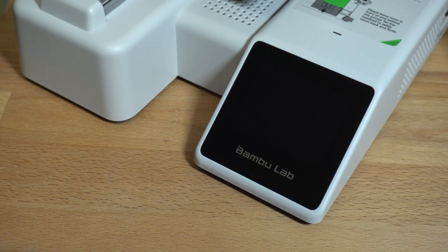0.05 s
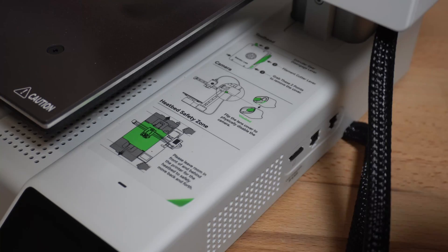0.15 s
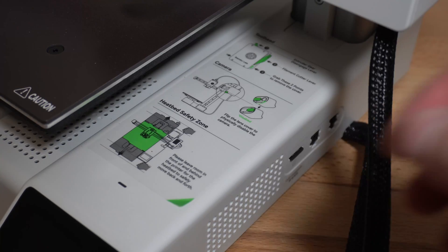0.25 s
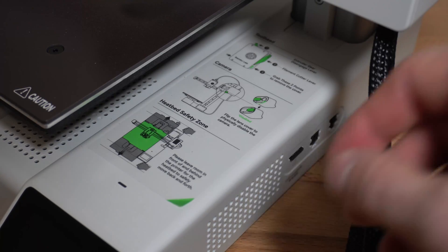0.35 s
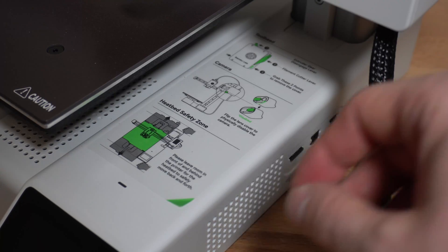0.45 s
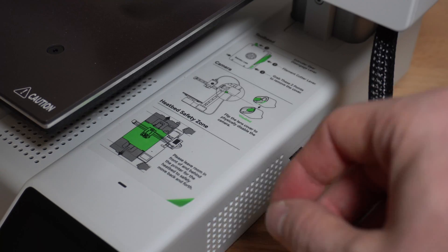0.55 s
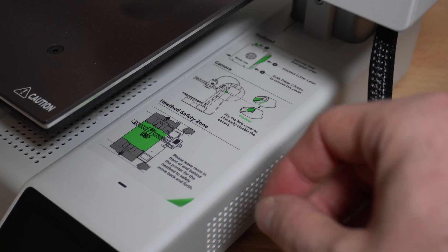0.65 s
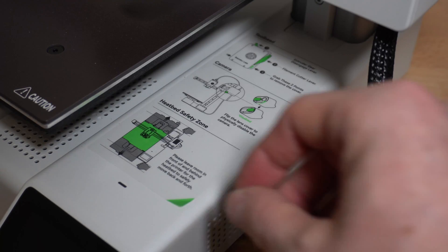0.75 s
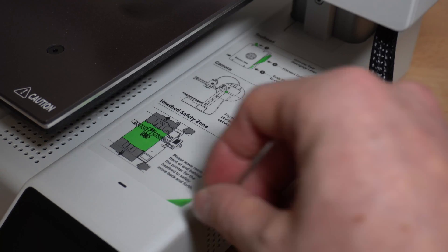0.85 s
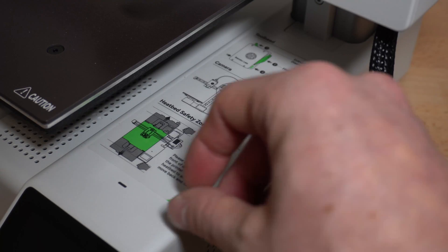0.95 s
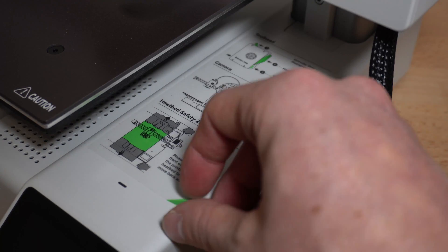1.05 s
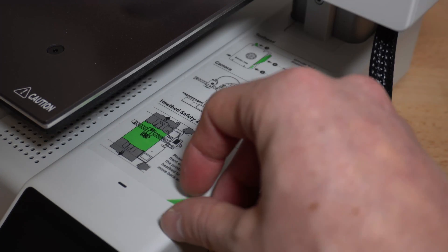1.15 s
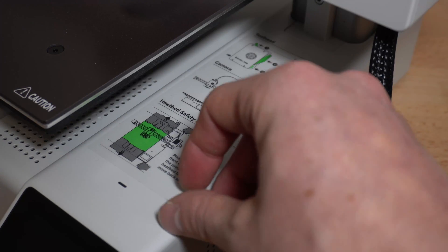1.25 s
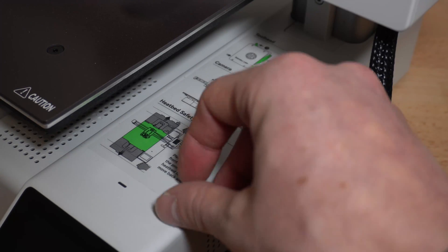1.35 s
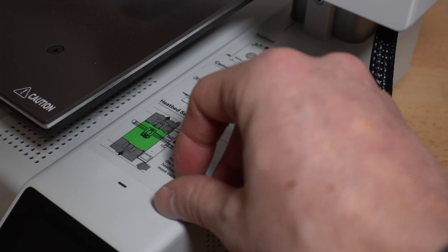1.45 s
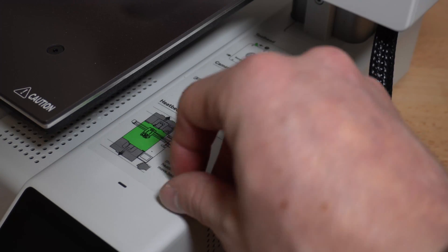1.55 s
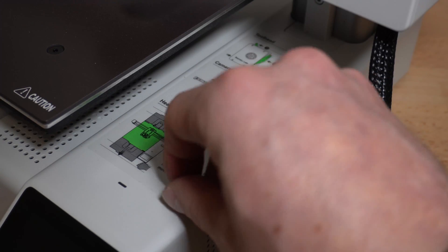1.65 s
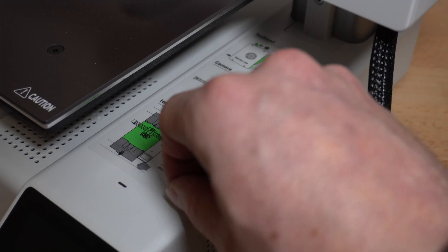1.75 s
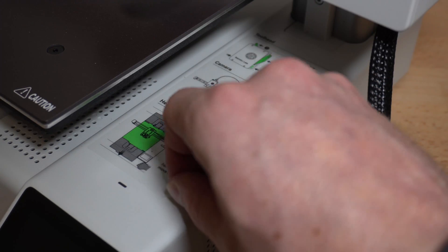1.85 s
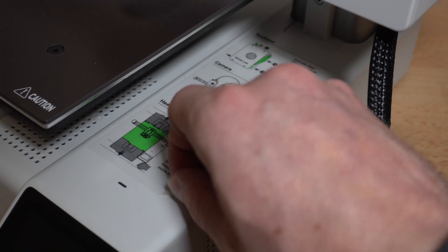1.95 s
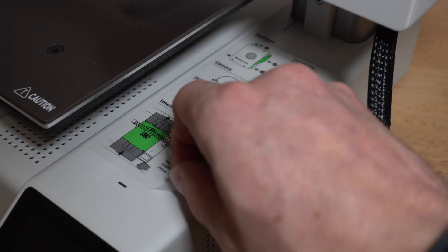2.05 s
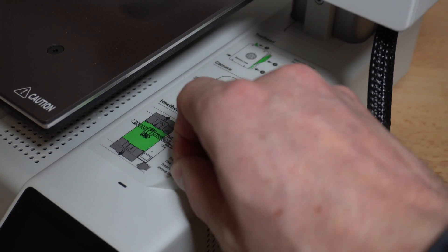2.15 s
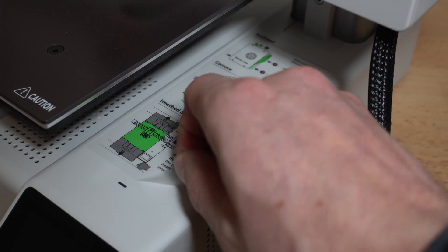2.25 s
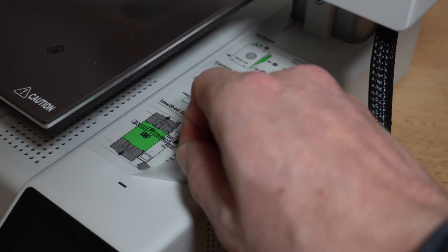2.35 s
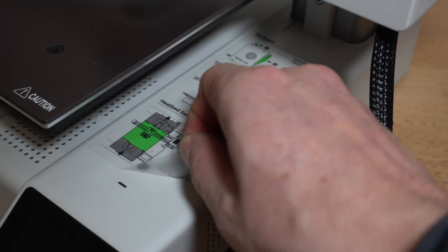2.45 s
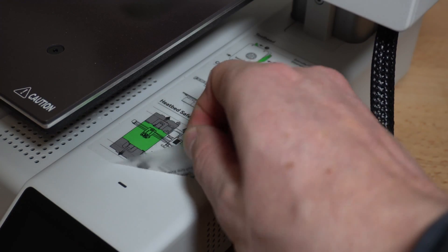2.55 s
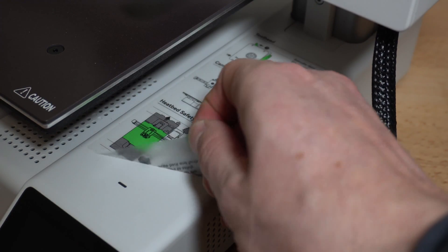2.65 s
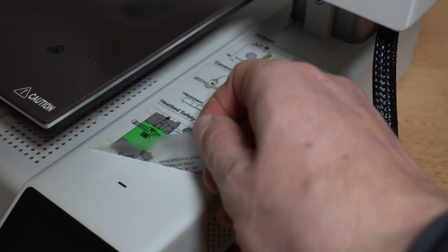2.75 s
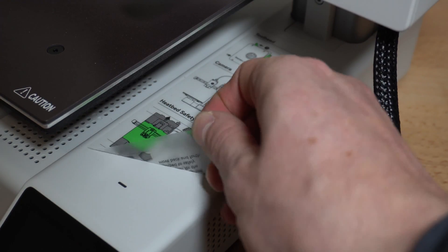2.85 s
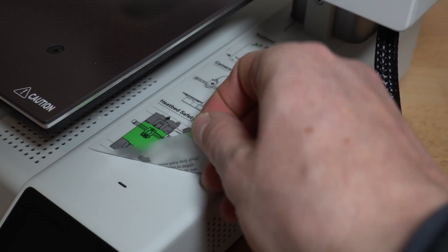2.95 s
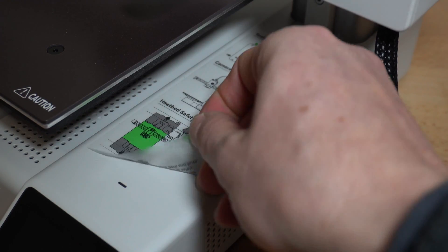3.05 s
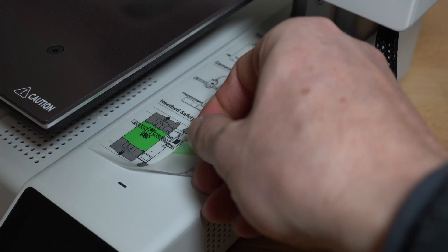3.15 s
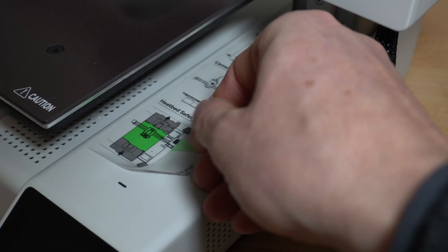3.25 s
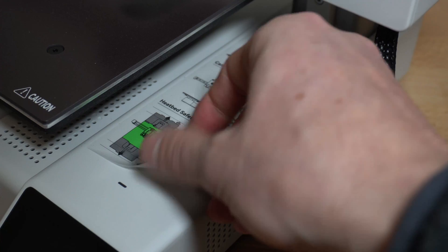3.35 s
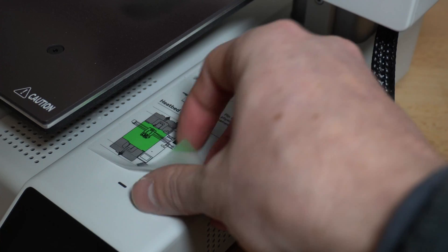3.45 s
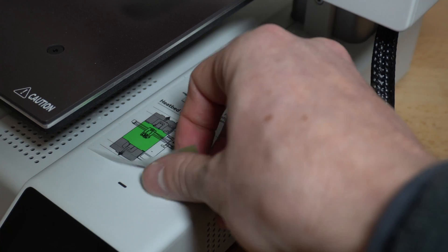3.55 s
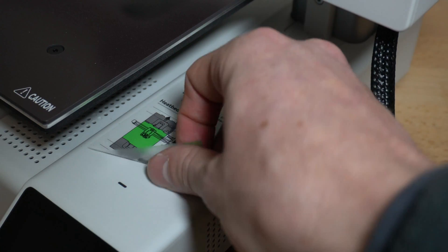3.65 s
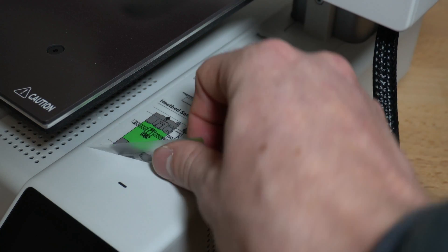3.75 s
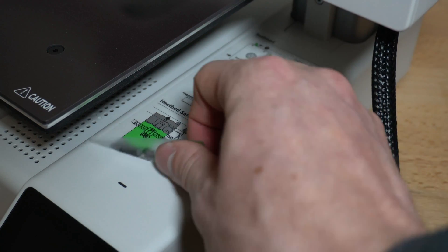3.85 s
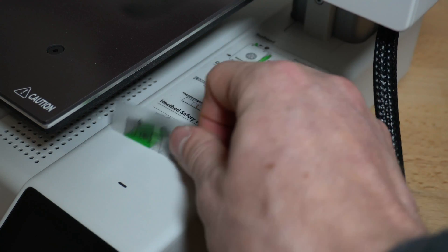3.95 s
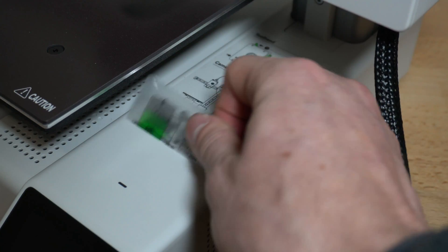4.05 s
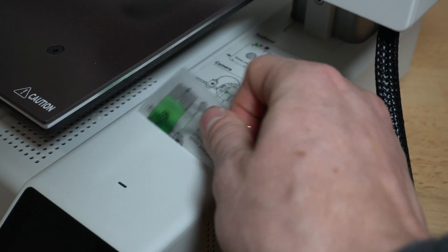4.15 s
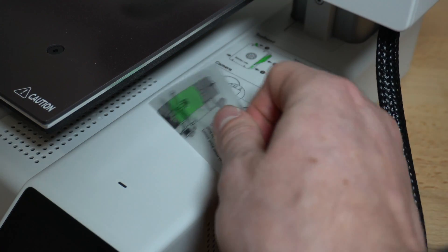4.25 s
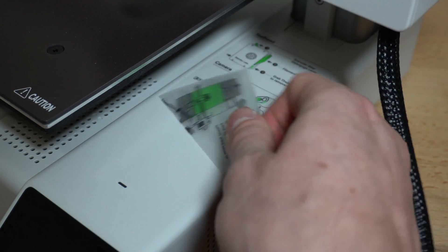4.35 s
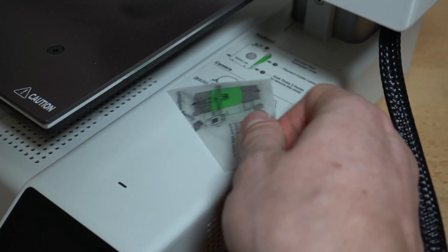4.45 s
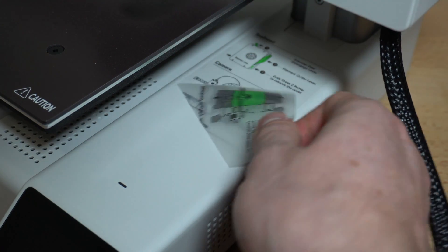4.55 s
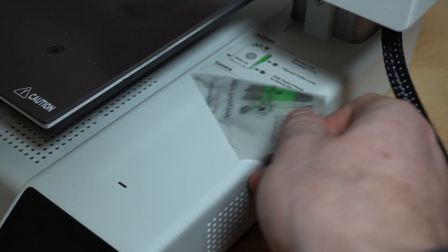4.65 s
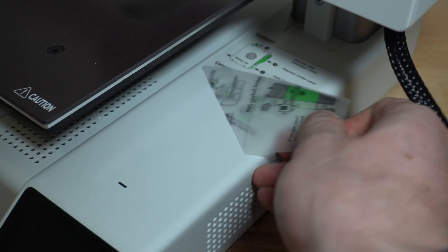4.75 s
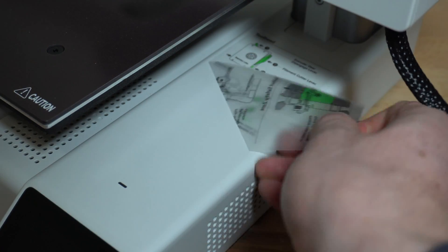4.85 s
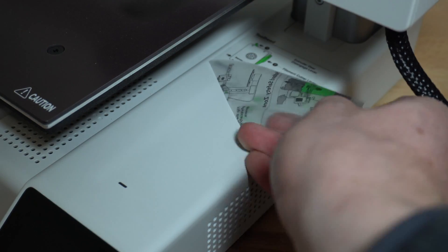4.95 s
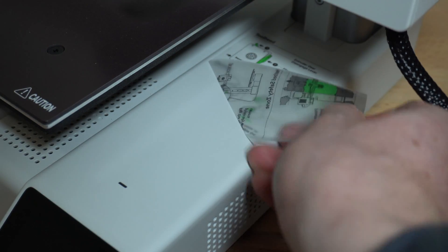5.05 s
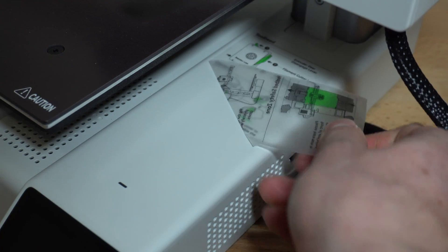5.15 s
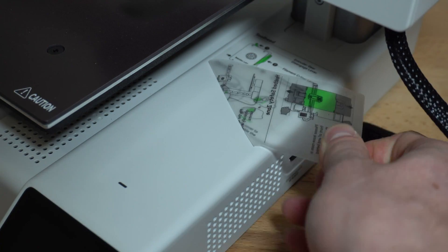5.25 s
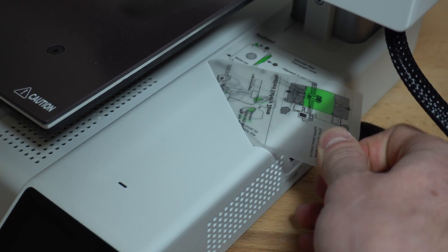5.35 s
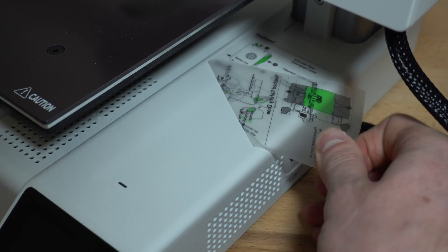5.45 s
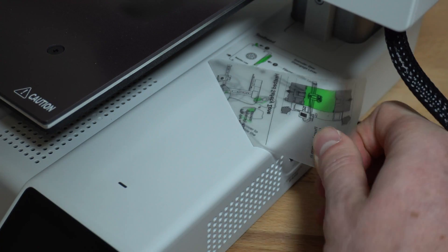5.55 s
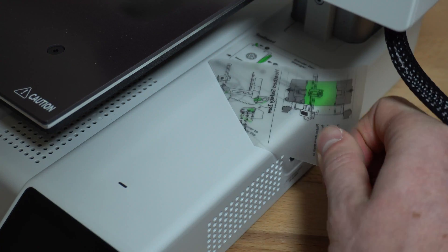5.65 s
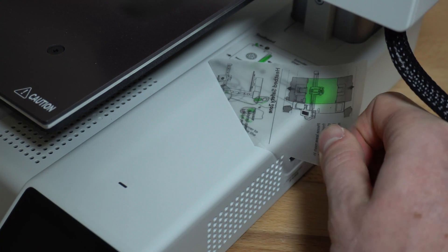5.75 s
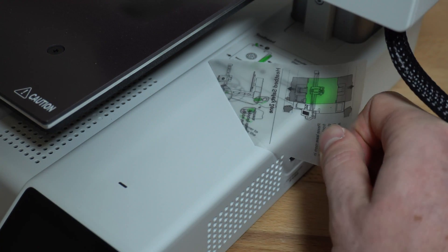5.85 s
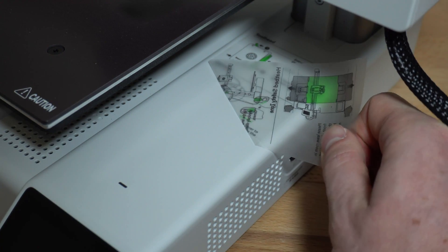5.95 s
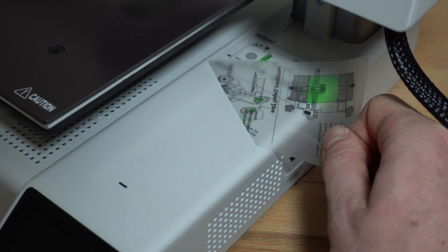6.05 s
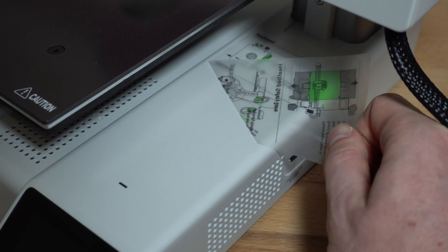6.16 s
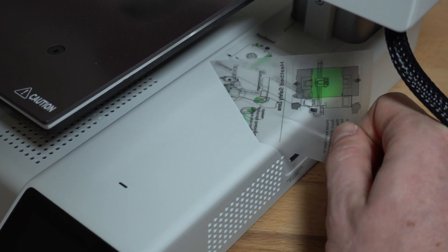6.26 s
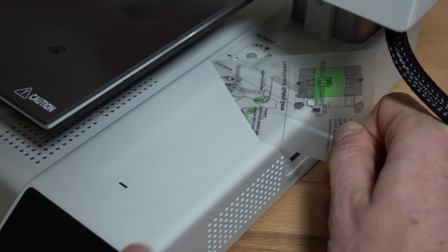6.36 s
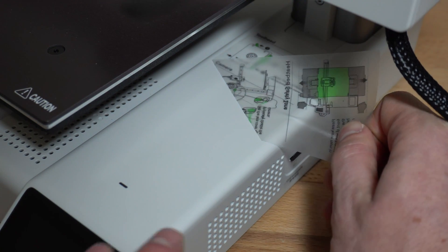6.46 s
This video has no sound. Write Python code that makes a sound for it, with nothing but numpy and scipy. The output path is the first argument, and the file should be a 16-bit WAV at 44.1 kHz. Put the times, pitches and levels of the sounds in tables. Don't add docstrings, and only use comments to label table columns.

```python
import sys
import numpy as np
from scipy import signal
from scipy.fft import rfft, irfft
from scipy.io import wavfile

SR = 44100
rng = np.random.default_rng(int(sys.argv[2]) if len(sys.argv) > 2 else 0)


def linear_from_db(decibels):
    return 10 ** (np.asarray(decibels, float) / 20)


def output_pcm(signal):
    pcm = np.clip(np.atleast_2d(signal).T, -1, 1) * 32767
    wavfile.write(sys.argv[1], SR, np.round(pcm).astype(np.int16))


N = 287532


def rms_one(x):
    return x / np.sqrt(np.mean(x ** 2) + 1e-20)


def peak_one(rows):
    return rows / np.abs(rows).max(axis=1, keepdims=True)


def lay(time_s, waves):
    out = np.zeros(N + waves.shape[1])
    starts = np.round(np.array(time_s) * SR).astype(int)
    np.add.at(out, starts[:, None] + np.arange(waves.shape[1]), waves)
    return out[:N]


def drift(rate_hz):
    r = np.exp(-40 * np.pi * rate_hz / SR)
    white = rng.standard_normal(N // 20 + 2002)
    slow = signal.lfilter([1], [1, -2 * r, r * r], white)[2000:]
    return np.interp(np.arange(N) / 20, np.arange(len(slow)), rms_one(slow))


def resonate(x, hz, width_hz):
    r = np.exp(-np.pi * width_hz / SR)
    b = [(1 - r * r) / 2, 0, (r * r - 1) / 2]
    return signal.lfilter(b, [1, -2 * r * np.cos(2 * np.pi * hz / SR), r * r], x)


def coloured(spectrum):
    hz, level_db = np.transpose(spectrum)
    grid_hz = np.maximum(np.arange(N // 2 + 1) * SR / N, 1)
    gain = linear_from_db(np.interp(np.log(grid_hz), np.log(hz), level_db))
    return rms_one(irfft(rfft(rng.standard_normal(N)) * gain, N))


def skin_lowpass(x, cut_hz):
    return signal.sosfilt(signal.butter(3, cut_hz, fs=SR, output="sos"), x)


def presses(rows, let_go_s=0.033):
    press_s = 0.013
    start_s, hold_s, level_db, *bright_db = np.transpose(rows)[:, :, None]
    t = np.arange(0, N + 64, 64) / SR
    attack = np.clip((t - start_s) / press_s + 0.5, 0, 1) ** 2
    shape = attack * np.exp(-np.maximum(t - start_s - hold_s, 0) / let_go_s)
    levels_db = [level_db] + [level_db + b for b in bright_db]
    return [np.interp(np.arange(N) / SR, t, np.sum(linear_from_db(db) * shape, axis=0)) for db in levels_db]


# (time [s], hold [s], level [dB])
GUST_ROWS = [
    (0, 7.1, -63.5),
    (0.15, 0.05, -55),
    (0.367, 0.1, -51),
    (0.54, 0.36, -56),
    (3.895, 0.11, -57),
    (4.893, 0.29, -51),
    (5.602, 0.48, -57.5),
    (6.167, 0.054, -54),
]
# (time [s], hold [s], level [dB])
DESK_ROWS = [
    (0, 6.6, -71.5),
    (.16, 0.31, -66),
    (2.3, 0.38, -59.5),
    (3.16, 0.021, -50),
    (3.92, 0.24, -54),
    (4.2, 0.68, -59),
    (5.301, 0.48, -60.5),
    (6.131, 0.02, -50.5),
]


def draught():
    out = 0
    for edges_hz, rows in (([10, 27.4], GUST_ROWS), ([90, 483], DESK_ROWS)):
        band = signal.butter(3, edges_hz, "band", fs=SR, output="sos")
        noise = rms_one(signal.sosfilt(band, rng.standard_normal(N)))
        out = out + linear_from_db(-7.0) * presses(rows)[0] * noise
    return out


# (freq [Hz], width [Hz], level [dB])
MOTOR_TONES = [
    (64.5, 12, -80.5),
    (125, 6.9, -77),
]


def hum():
    white = rng.standard_normal(N)
    out = 0
    for hz, width_hz, db in MOTOR_TONES:
        out = out + linear_from_db(db) * rms_one(resonate(resonate(white, hz, width_hz), hz, width_hz))
    return out


# (freq [Hz], density [dB/Hz])
AIR_SPECTRUM = [(14, -10.5), (25, 5.5), (50, -0.5), (90, -7), (160, -3.5), (230, -6), (400, -1),
                (700, -15.5), (1300, -10), (2200, -18), (4000, -22), (8000, -25), (16500, -25)]


def room_air():
    return linear_from_db(-66) * coloured(AIR_SPECTRUM)


# (freq [Hz], density [dB/Hz])
CAPSULE_SPECTRUM = [(12, -37), (20, -1.5), (43, -17.5), (123, -20), (210, -19.5), (347, -25.5), (1060, -28),
                    (4810, -25.5), (16000, -30)]


def capsule_hiss():
    return linear_from_db(-72) * coloured(CAPSULE_SPECTRUM)


# (time [s], hold [s], level [dB], brightness [dB])
RUB_ROWS = [(0.0, 0.016, -60, -16), (0.23, 0.21, -63, -8), (0.7, 0.26, -71.5, -22), (1.3, 0.31, -62, -30),
            (2.06, 0.04, -60, 0), (2.14, 0.17, -68, -3.5), (2.22, 0.067, -69, 6), (2.285, 0.042, -57.5, 3),
            (2.35, 0.14, -62, 5.5), (2.48, 0.12, -59, 5.5), (2.6, 0.17, -59, 8.5), (2.8, 0.32, -75.5, 1),
            (3.38, 0.36, -65.5, -0.5), (3.5, 0.059, -56.5, 0), (3.74, 0.16, -63.5, -4.5),
            (3.91, 0.096, -38.5, -1), (4.02, 0.096, -37, -4), (4.15, 0.28, -43, -2.5),
            (4.44, 0.085, -47.5, 0), (4.55, 0.18, -43, 2.5), (4.72, 0.073, -47, -5), (4.81, 0.045, -44, -3),
            (4.88, 0.092, -44, -5.5), (5.04, 0.025, -54, -3), (5.085, 0.035, -50, -1),
            (5.2, 0.32, -63.5, -7), (5.53, 0.04, -65.5, 2), (5.58, 0.083, -67, 4), (5.68, 0.034, -66, 2),
            (5.76, 0.44, -73.5, 1), (6.12, 0.54, -61, 0.5)]
# (freq [Hz], width [Hz], level [dB])
CASING_MODES = [(340, 28, -7.5), (444.2, 22.5, 0.5), (551.7, 16.8, -1), (635, 87, -1.5), (926, 190, -2.5),
                (1054, 200, -1.5)]
# (freq [Hz], width [Hz], level [dB])
FILM_MODES = [(1603, 24, 3), (1830, 60, -2), (2100, 660, 0.5), (2280, 426, 2.5), (2710, 437, 1.5),
              (2810, 656, 2.5), (3540, 423, 0.5), (3945, 1120, 7), (4133, 1436, 5.5), (6115, 1300, -9.5)]
# (freq [Hz], width [Hz], level [dB])
GLUE_MODES = [(8540, 3940, -5.5), (13000, 12000, -1.5)]


def rubbing():
    slip_odds = 2500 * linear_from_db(3.0 * drift(25)) / SR
    slips = (rng.random(N) < slip_odds) * rng.choice([-1, 1], N)
    strength_db = 1.0 * np.minimum(rng.exponential(1, N), 5)
    slips = slips * linear_from_db(strength_db) + 0.028 * rng.standard_normal(N)
    dull, bright = presses(RUB_ROWS)
    fizz_gain = bright * linear_from_db(-8.5 - 11.5)
    out = 0
    for modes, gain in ((CASING_MODES, dull), (FILM_MODES, bright), (GLUE_MODES, fizz_gain)):
        rung = 0
        for k, (hz, width_hz, db) in enumerate(modes):
            grip = linear_from_db(db + 2 * drift(6))
            rung = rung + (-1) ** k * grip * resonate(slips, hz, 1.7 * width_hz)
        if modes is not GLUE_MODES:
            rung = skin_lowpass(rung, 6350)
        out = out + 0.82 * gain * rms_one(rung)
    return out


def struck(bursts, modes, spread_db, top_hz):
    luck = linear_from_db(spread_db * rng.standard_normal((len(bursts), len(modes))))
    out = 0
    for k, (hz, width_hz, db) in enumerate(modes):
        gain = (-1) ** k * linear_from_db(db) * luck[:, [k]] / (1 + (hz / top_hz) ** 2)
        out = out + gain * resonate(bursts, hz, width_hz)
    return peak_one(out)


# (time [s], peak [dB], casing knock [dB], pitch [Hz])
TOUCHES = [(0.014, -44.5, -17, 1500), (0.02, -48.5, -12, 1710), (0.091, -47.5, -15, 2100),
           (0.105, -48, -20, 2400), (0.2505, -35, -12.5, 2580), (0.4, -49, -6, 1500), (0.675, -64, 2, 1310),
           (0.732, -45.5, -15, 1440), (1.085, -47, -15.5, 1420), (1.292, -44.5, -6, 1980),
           (1.541, -43.5, -18, 1430), (1.551, -39, -12, 2270), (1.578, -60, 7, 1420), (1.873, -63, 9, 1420),
           (2.06, -58, -1, 1000), (2.218, -59, 1.5, 2200), (2.906, -60, 9.5, 1050), (3.006, -53, -5, 1050),
           (3.074, -38.5, -5.5, 1400), (3.123, -64, 12, 1420), (3.366, -56, -5, 1500),
           (3.395, -39.5, -6, 1880), (3.811, -25.5, -14, 1940), (5.178, -44, 2.5, 1200),
           (5.3556, -36, -11, 1500), (5.676, -29.5, -11, 2600), (5.762, -33, -9, 2470),
           (6.136, -29.5, -11, 3000)]
# (time [s], peak [dB], casing knock [dB], brightness [dB], film pitch [Hz])
NAIL_SNAPS = [(1.947, -36, -20, -12.5, 4000), (2.085, -41, -10, -7, 1370), (2.101, -18, -25.5, -11.5, 4200),
              (2.285, -36.5, -7, -10, 3320), (2.348, -18.5, -18, -14.5, 2960), (2.411, -34, -15, -16, 3260),
              (2.4924, -24, -17, -19, 2570), (2.5, -18, -16, -13, 2580), (2.604, -35, -32, -13, 1640),
              (2.619, -25, -18, -11, 1590), (2.644, -10.5, -22, -14, 4520), (2.665, -16.5, -20, -13, 4560),
              (2.71, -34, -10, -16, 2540), (2.75, -22.5, -21, -12.5, 1220), (2.848, -39, -40, -29, 2600),
              (3.173, -23.5, -13.5, -13.5, 4460), (3.226, -25.5, -29.5, -22, 3620),
              (3.241, -27.5, -25, -40, 4400), (3.59, -29, -45, -17, 6550)]
PEEL_SNAPS = [(3.893, -21, -33, -17, 4200), (3.9058, -11, -17, -16.5, 4320),
              (3.9257, 0.5, -18.5, -21, 3065), (3.9452, -11, -13.5, -7, 1810),
              (3.9651, -6, -19.5, -18, 4480), (3.9774, -6.5, -23.5, -31, 2780),
              (4.027, -7.5, -17, -15.5, 2760), (4.0557, -15.5, -38, -12, 3520),
              (4.0719, -7.5, -19, -19, 3350), (4.0908, -10.5, -27, -20, 3440),
              (4.1467, -19, -16, -12.5, 1670), (4.2058, -21, -14.5, -14.5, 2710),
              (4.237, -24, -27, -9.5, 3600), (4.2588, -24, -29.5, -18, 2700), (4.281, -21, -18, -15, 3280),
              (4.2975, -13.5, -17.5, -19, 3100), (4.341, -23.5, -22, -28, 2710),
              (4.378, -18, -15, -22, 2450), (4.4021, -23.5, -12, -29, 1550),
              (4.4298, -27.5, -30, -16, 3460)]
LATE_SNAPS = [(4.5448, -13, -16.5, -31, 3560), (4.5493, -32, -7, -4, 3640), (4.5749, -17, -9.5, -31, 4940),
              (4.617, -11, -18.5, -18.5, 3630), (4.637, -20.5, -8, -10.5, 3550),
              (4.701, -14.5, -12, -33, 3520), (4.7184, -16, -18.5, -11.5, 3100),
              (4.735, -12.5, -10.5, -11, 3700), (4.7443, -10.5, -40, -20, 5000),
              (4.8014, -32, -9, -11, 5040), (4.832, -24, -6, -6.5, 4130), (4.8626, -25, -7, -9.5, 1500),
              (4.909, -31, -6, -22.5, 2160), (4.9365, -6.5, -21.5, -18.5, 4300),
              (4.9639, -22.5, -2.5, -5.5, 3630), (5.0577, -37, -3, -23, 3380),
              (5.0848, -10, -20, -19, 4150), (5.265, -39, -21, -11.5, 4250), (5.377, -22, -12.5, -43, 3170),
              (5.575, -39.5, -16, -16.5, 1600), (6.386, -32, -12, -10.5, 3580)]
# (time [s], peak [dB])
FINE_SNAPS = [(2.2997, -33.5), (2.3147, -30), (2.3377, -40), (2.4815, -29), (2.5336, -40), (2.59, -38),
              (2.6254, -32), (2.6336, -29.5), (2.726, -36), (3.2288, -33.5), (3.9178, -21), (3.9592, -12.5),
              (3.9845, -14.5), (4.0081, -34), (4.0237, -29), (4.0378, -17), (4.1002, -18.5),
              (4.1167, -22.5), (4.1282, -20), (4.1654, -18), (4.2168, -22), (4.3073, -25), (4.5409, -17),
              (4.5784, -18), (4.7763, -24), (4.8555, -26), (4.9429, -20), (5.0764, -20), (5.248, -42),
              (5.6245, -43)]
# (time [s], peak [dB], brightness [dB])
SMALL_TICKS = [(2.3015, -48, -11), (2.5144, -39, -9), (2.5635, -51, -16), (2.5697, -38.8, -12),
               (2.629, -32, -21), (2.677, -33, -14), (3.8837, -46, -16), (3.8963, -36, -16),
               (3.9299, -16, -16), (3.9806, -19.5, -19), (3.9876, -24, -9), (3.9983, -33, -19),
               (4.06, -33, -18), (4.08, -26, -16), (4.1059, -22.6, -16), (4.1603, -25, -13),
               (4.171, -27, -5), (4.1759, -32, -12), (4.1935, -37, -16), (4.1989, -29, -25),
               (4.2223, -28, -12), (4.2708, -35.3, -16), (4.2764, -32.7, -18), (4.2884, -28, -18),
               (4.3156, -23, -14), (4.3228, -27, -16), (4.3258, -35, -10), (4.3462, -33, -12),
               (4.3564, -25.5, -18), (4.3619, -30.7, -14), (4.3805, -24, -8), (4.3885, -27, -21),
               (4.4076, -28, -22), (4.4128, -23.5, -24), (4.4244, -32, -18), (4.4463, -48, -16),
               (4.4789, -37, -16), (4.4831, -38, -21), (4.4866, -50, -18), (4.4952, -40, -19),
               (4.51, -38, -19),
               (4.5552, -24, -12), (4.5639, -36, -10), (4.586, -28, -10), (4.5927, -41, -16),
              (4.6009, -41, -12.5), (4.6325, -19, -15.5), (4.6426, -18, -16), (4.6457, -21, -12.5),
              (4.651, -26.8, -14.5), (4.6546, -22, -11), (4.658, -18.5, -13), (4.6629, -20.5, -14),
              (4.6672, -14.5, -16), (4.6705, -19, -14), (4.6743, -11, -15), (4.6821, -15, -12),
              (4.6878, -20, -19), (4.6911, -17.5, -12.5), (4.6968, -28, -19), (4.7227, -17, -14),
              (4.7257, -15.5, -10), (4.739, -22, -14), (4.748, -16.5, -11.5), (4.7566, -17.5, -14),
              (4.7643, -25, -9.5), (4.7848, -35, -15), (4.8185, -44, -20.5), (4.8902, -35, -15.5),
              (4.929, -19, -14.5), (4.9335, -14.5, -14), (4.9512, -30.5, -20), (4.957, -22.5, -19.5),
              (5.072, -29, -21.5)]
# (freq [Hz], width [Hz], level [dB])
FIZZ_MODES = [(7220, 780, 0), (8030, 1300, -1.5), (11080, 2400, -4), (13600, 5300, -9)]


def snaps():
    touch_bright_db, snap_cut_hz, echo_s, echo_db = -38, 6300, 0.0034, -10
    touches = [(s, db, knock, touch_bright_db, hz) for s, db, knock, hz in TOUCHES]
    fine = [(s, db, -16.0, -14.0, 3600) for s, db in FINE_SNAPS]
    ticks = [(s, db, -13.0, bright, 4000) for s, db, bright in SMALL_TICKS]
    events = [*touches, *NAIL_SNAPS, *PEEL_SNAPS, *LATE_SNAPS, *fine, *ticks]
    time_s, peak_db, knock_db, bright_db, pitch_hz = np.transpose(events)
    count = len(time_s)
    t = np.arange(2048) / SR

    hardness = np.clip((peak_db + 52) / 14, 0.1, 1)
    tear_s = 0.00097 / hardness[:, None] * linear_from_db(2.5 * rng.standard_normal((count, 1)))
    grit = np.clip(rng.standard_normal((count, len(t))) ** 3, -7, 7)
    bursts = 0.062 * grit * (np.exp(-t / tear_s) + 0.05 * np.exp(-t / 0.011))
    bursts[:, 24] += hardness * rng.choice([-1, 1], count)
    lag = round(echo_s * SR)
    bursts[:, lag:] += linear_from_db(echo_db) * bursts[:, :-lag]

    top_hz = pitch_hz[:, None]
    flap = peak_one(np.array([resonate(b, hz, 0.13 * hz) for b, hz in zip(bursts, pitch_hz)]))
    crack = peak_one(np.array([resonate(b, hz, hz) for b, hz in zip(bursts, pitch_hz)]))
    film = 0.65 * struck(bursts, FILM_MODES, 2.5, 5.5 * top_hz) + 0.42 * flap + 0.53 * crack
    touch_cut_hz = np.minimum(2 * pitch_hz, snap_cut_hz)
    cut_hz = np.where(np.arange(count) < len(touches), touch_cut_hz, snap_cut_hz)
    film = np.array([skin_lowpass(row, hz) for row, hz in zip(film, cut_hz)])
    fizz = struck(bursts * np.exp(-t / 0.009), FIZZ_MODES, 1.4, 10 * top_hz)
    knock = struck(bursts, CASING_MODES, 3, top_hz)
    waves = film + linear_from_db(bright_db + 3.5)[:, None] * fizz + linear_from_db(knock_db + 4.5)[:, None] * knock
    return lay(time_s, linear_from_db(peak_db - 1.0)[:, None] * waves)


def room(x):
    t60_s, wall_cut_hz = 0.31, 8600
    dull = np.exp(-2 * np.pi * wall_cut_hz / SR)
    out = np.zeros(N)
    lags = (rng.uniform(0.0078, 0.03, 8) * SR).astype(int)
    for k, lag in enumerate(lags):
        loop, state = x.copy(), [0.0]
        gain = linear_from_db(-60 * lag / SR / t60_s)
        for i in range(lag, N, lag):
            back, state = signal.lfilter([gain * (1 - dull)], [1, -dull], loop[i - lag:i], zi=state)
            loop[i:i + lag] += back[:N - i]
        out += (loop - x) * (-1) ** k
    return out


# (time [s], peak [dB], pitch [Hz])
TAPS = [(0.2419, -39.5, 340), (.2505, -41.5, 920), (0.3573, -41, 324), (.401, -45.5, 340),
        (.18, -47.5, 322), (2.908, -50, 454), (3.034, -46, 436), (3.076, -49, 445), (3.173, -42.5, 1030),
        (3.174, -47, 440), (4.966, -29, 650), (5.092, -28.5, 1050), (5.378, -39, 1000), (5.182, -41, 454),
        (6.136, -34.5, 440)]


def thumps():
    time_s, peak_db, pitch_hz = np.transpose(TAPS)
    t = np.arange(4096) / SR
    rustle = 0.12 * rng.standard_normal((len(TAPS), len(t))) * np.exp(-t / 0.021)
    pushes = (t / 0.00038) * np.exp(-t / 0.00018) + rustle
    rings = [resonate(push, hz, 0.24 * hz) + 0.31 * resonate(push, 2.23 * hz, 0.5 * hz)
             for push, hz in zip(pushes, pitch_hz)]
    return lay(time_s, linear_from_db(peak_db)[:, None] * peak_one(np.array(rings)))


# (time [s], hold [s], level [dB], brightness [dB])
STROKE_ROWS = [
    [(1.3, 0.26, -60.5, -7.5), (1.67, 0.05, -54.5, -3), (1.76, 0.043, -48.5, -1.5), (1.85, 0.051, -48, -28)],
    [(3.39, 0.0067, -43.5, -2.5), (3.44, 0.13, -52, -2), (3.5, 0.031, -50, -24), (3.72, 0.051, -50, -16)],
    [(6.14, 0.042, -55, -1), (6.19, 0.11, -62.5, 15), (6.38, 0.057, -58, 1), (6.46, 0.072, -65.5, 16)],
    [(.67, 0.012, -70, 13), (.78, 0.12, -65.5, -0.5)],
    [(3.47, 0.023, -70.5, 10), (3.505, 0.035, -55, -2)],
    [(3.54, 0.015, -60, -1), (3.588, 0.0036, -69, 24.5), (3.606, 0.0061, -68, -16)],
]
# (freq [Hz], width [Hz], level [dB])
STROKE_DULL = [
    [(414, 16, 0), (615, 51, 0)],
    [(649, 20, -11), (956, 110, 9.5)],
    [(657, 55, -4), (860, 50, 5)],
    [(870, 69, 0), (1100, 53, 0)],
    [(850, 80, 0.5), (1050, 200, -9)],
    [(1000, 200, 0), (2200, 150, 2)],
]
# (freq [Hz], width [Hz], level [dB])
STROKE_BRIGHT = [
    [(1370, 280, -0.5), (2170, 190, 4), (2960, 100, -1), (3760, 280, -4.5)],
    [(1600, 490, -6), (2208, 75, 3), (2960, 270, -11.5), (4000, 150, -14)],
    [(1500, 300, 29.5), (2360, 380, -13), (3460, 500, -14.5), (4700, 4900, -3)],
    [(1240, 250, 2), (1550, 190, -16)],
    [(3100, 250, -12), (4000, 300, 6.5)],
    [(3530, 900, -2.5), (5830, 1400, -1), (7500, 1700, -2.5)],
]


def strokes():
    skin = rng.standard_normal(N) * linear_from_db(1.2 * drift(40))
    out = 0
    for rows, *bodies in zip(STROKE_ROWS, STROKE_DULL, STROKE_BRIGHT):
        for modes, gain in zip(bodies, presses(rows, let_go_s=0.022)):
            rung = 0
            for k, (hz, width_hz, db) in enumerate(modes):
                rung = rung + (-1) ** k * linear_from_db(db) * resonate(skin, hz, width_hz)
            out = out + linear_from_db(-5.5) * gain * rms_one(rung)
    return out


def scene():
    cracks = snaps() + thumps()
    hand = cracks + linear_from_db(-22.5) * room(cracks) + rubbing() + strokes()
    centre = hand + draught() + hum() + room_air()
    side_treble = linear_from_db(-27) * resonate(hand, 11000, 9000)
    return centre + (capsule_hiss() + side_treble) * np.array([[1], [-1]])


def top_cut(x):
    return signal.sosfilt(signal.butter(12, 16970, fs=SR, output="sos"), x)


def record(dry):
    headroom, cutoff_hz = 0.7, 16050
    rounded = headroom * np.tanh(dry / headroom)
    top = signal.ellip(8, 0.3, 30, cutoff_hz - 200, fs=SR, output="sos")
    return top_cut(signal.sosfilt(top, rounded))


dry = scene()
out = record(dry)
output_pcm(out)
```